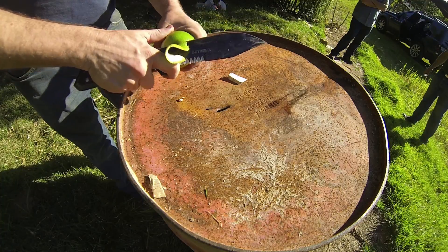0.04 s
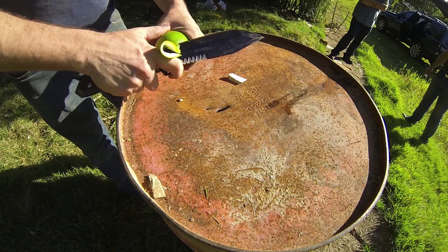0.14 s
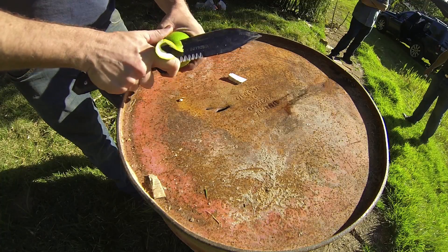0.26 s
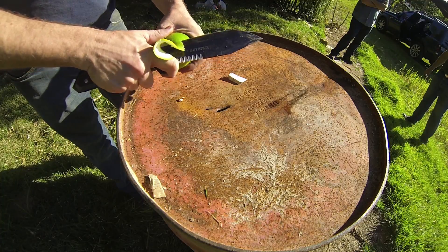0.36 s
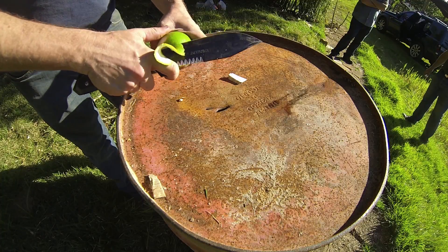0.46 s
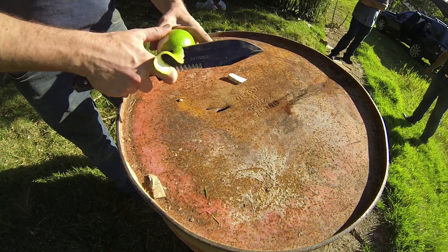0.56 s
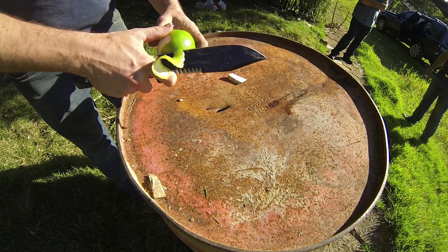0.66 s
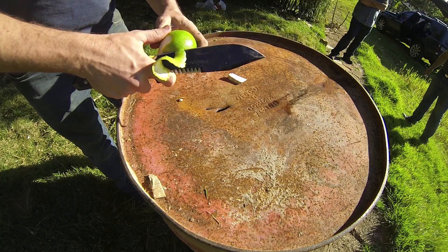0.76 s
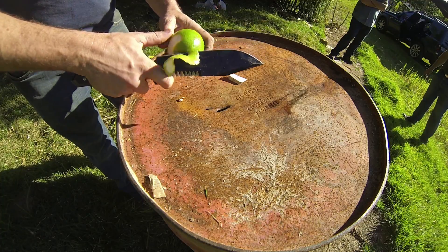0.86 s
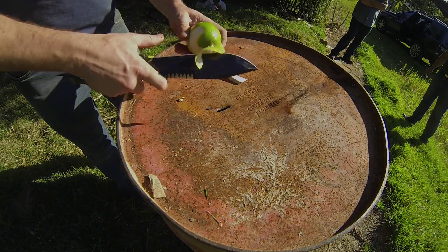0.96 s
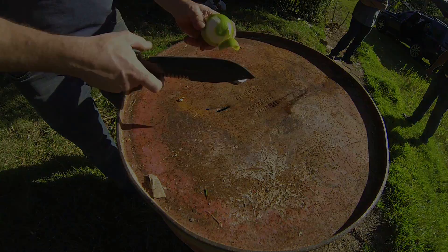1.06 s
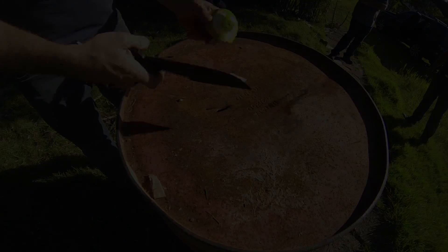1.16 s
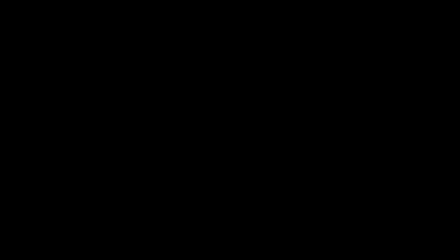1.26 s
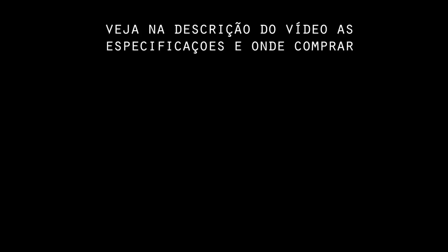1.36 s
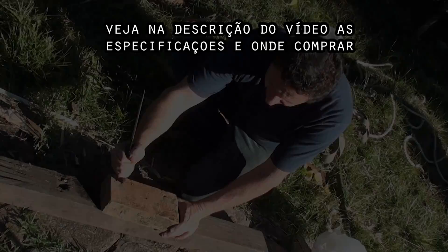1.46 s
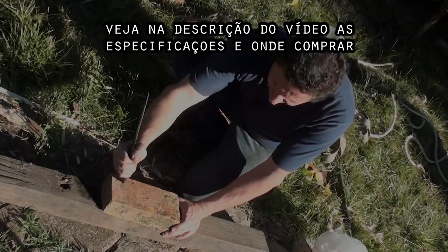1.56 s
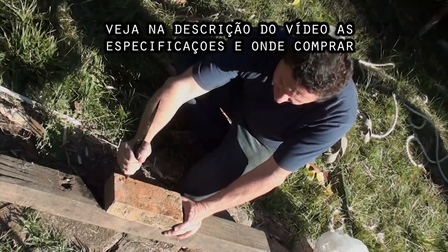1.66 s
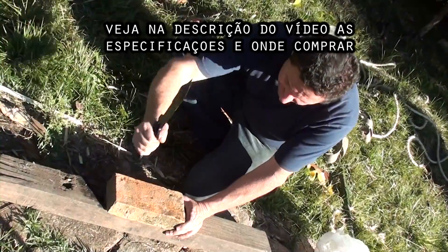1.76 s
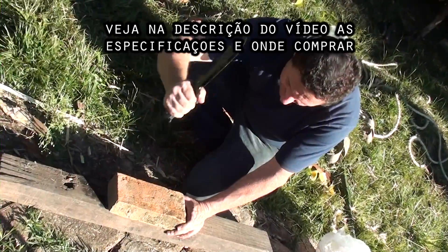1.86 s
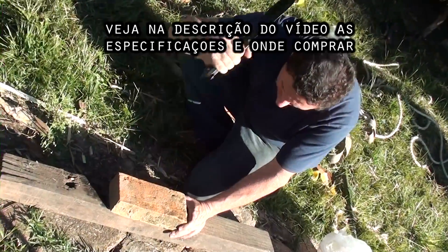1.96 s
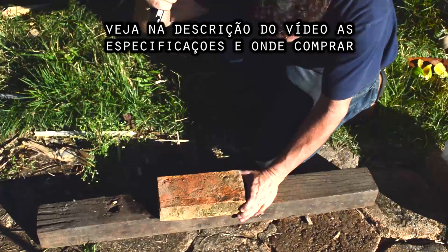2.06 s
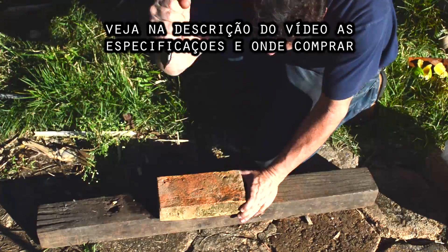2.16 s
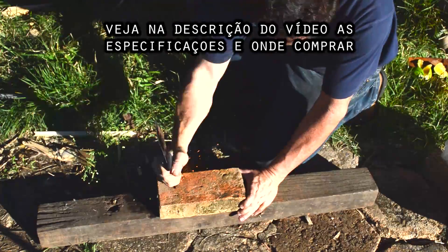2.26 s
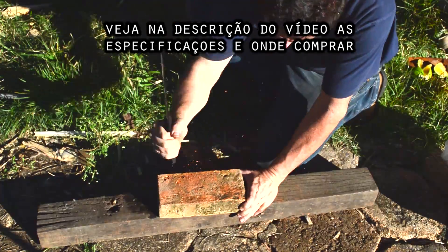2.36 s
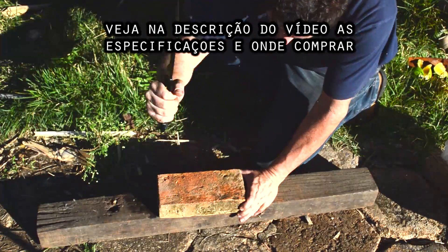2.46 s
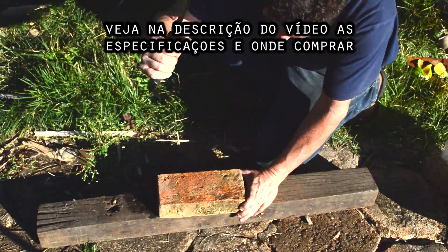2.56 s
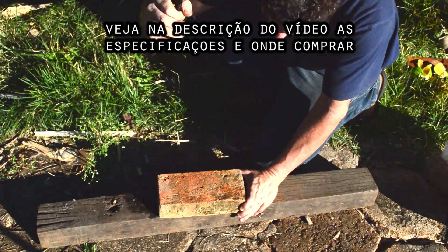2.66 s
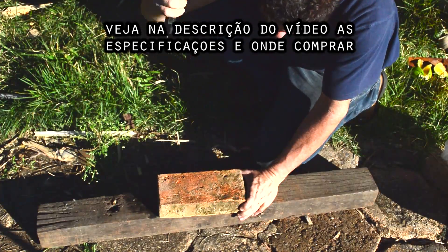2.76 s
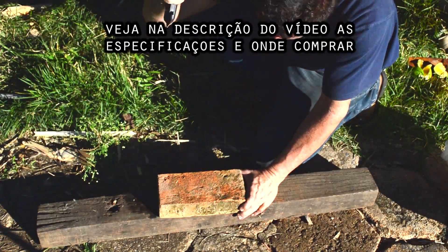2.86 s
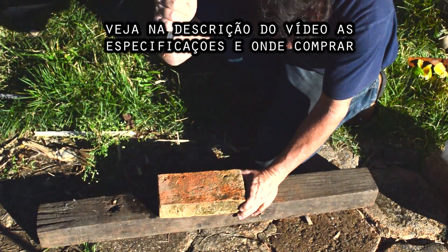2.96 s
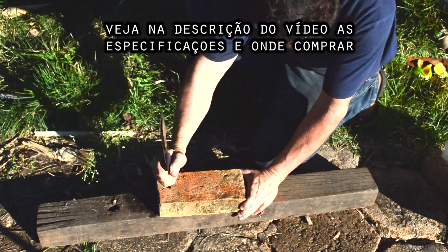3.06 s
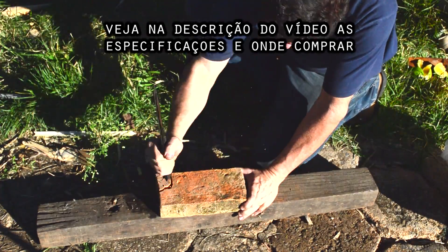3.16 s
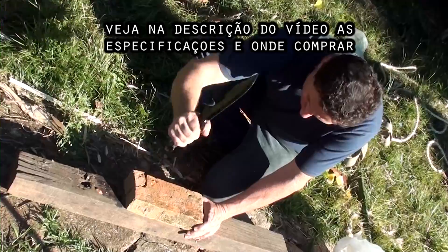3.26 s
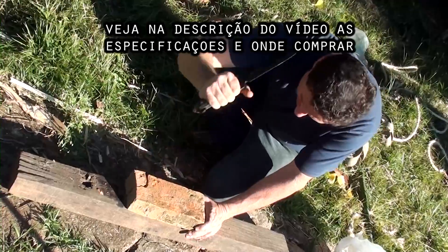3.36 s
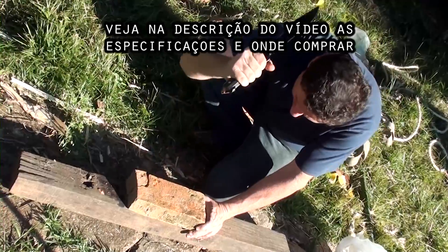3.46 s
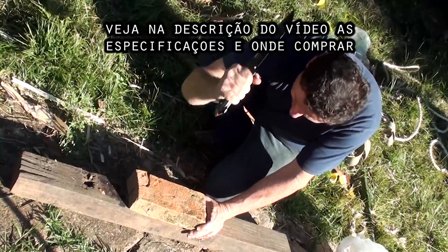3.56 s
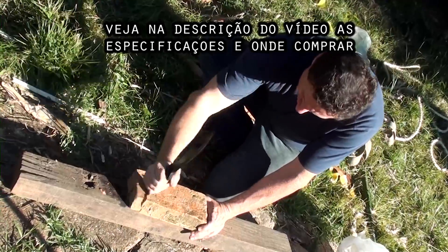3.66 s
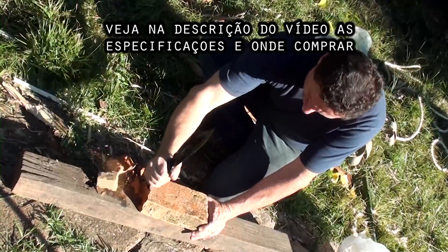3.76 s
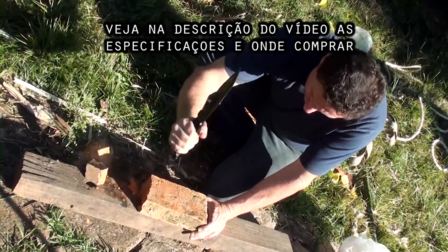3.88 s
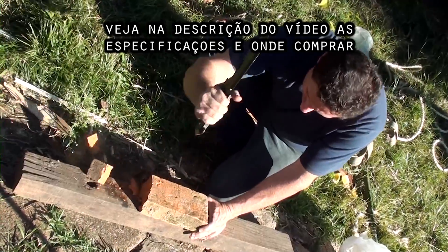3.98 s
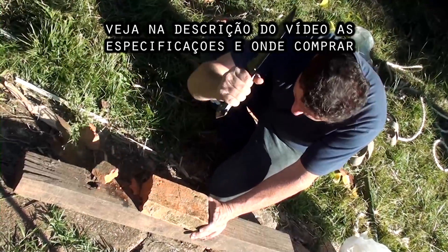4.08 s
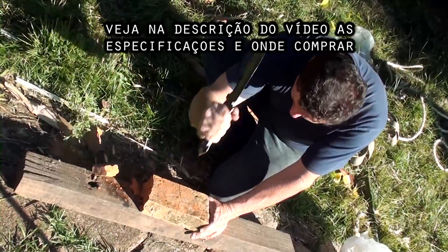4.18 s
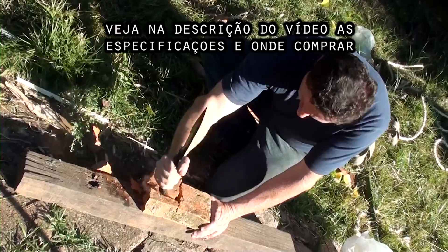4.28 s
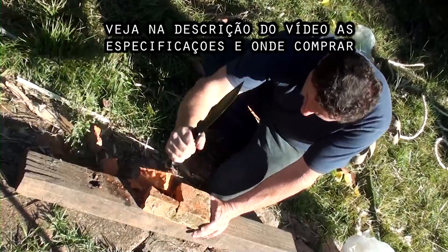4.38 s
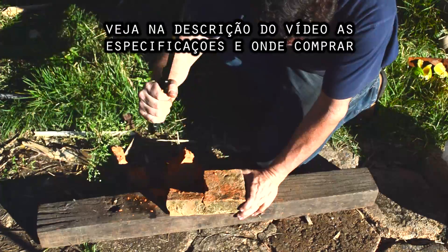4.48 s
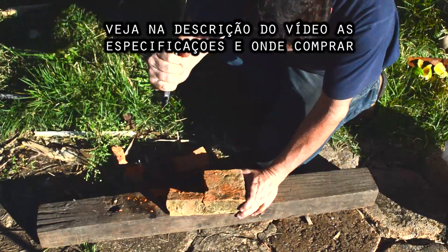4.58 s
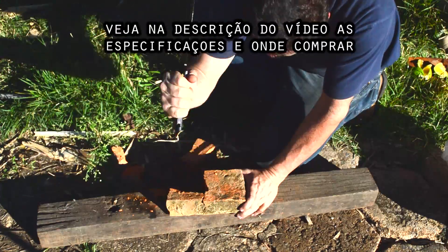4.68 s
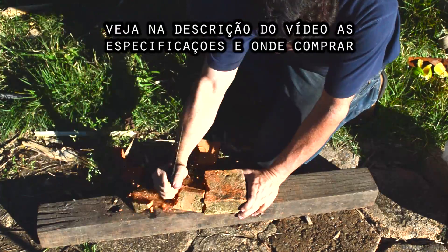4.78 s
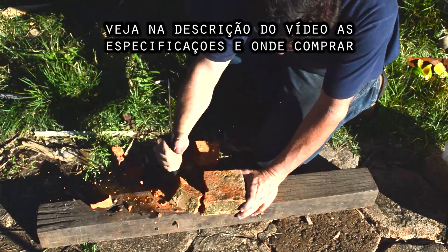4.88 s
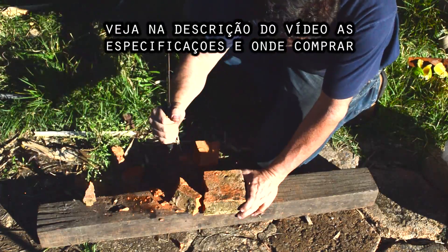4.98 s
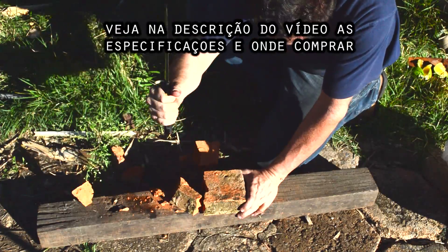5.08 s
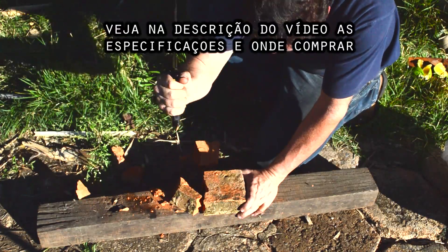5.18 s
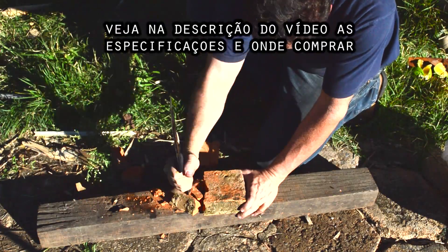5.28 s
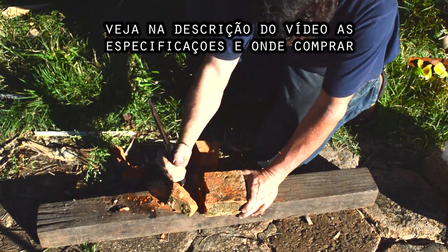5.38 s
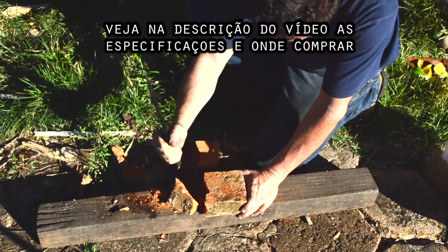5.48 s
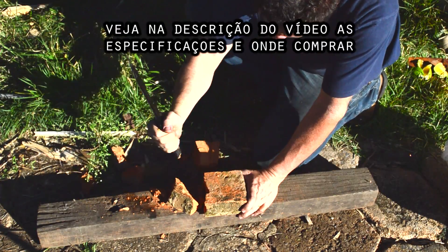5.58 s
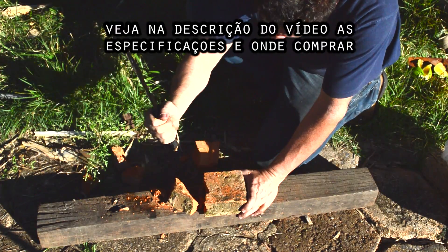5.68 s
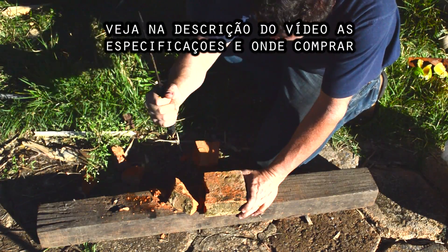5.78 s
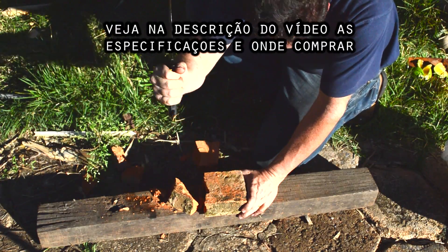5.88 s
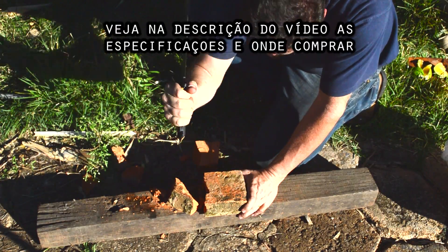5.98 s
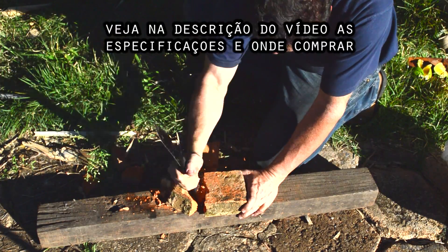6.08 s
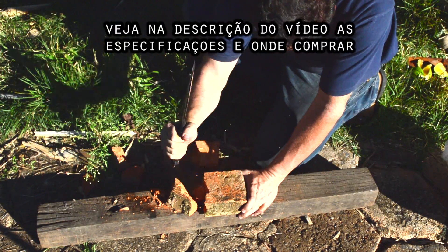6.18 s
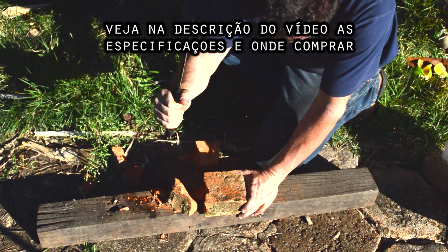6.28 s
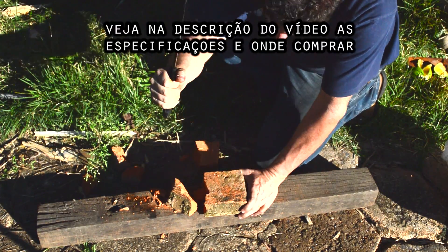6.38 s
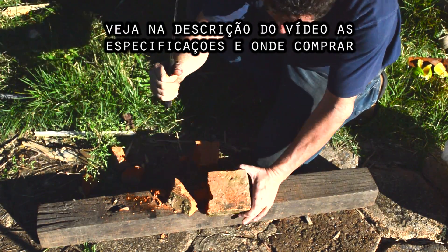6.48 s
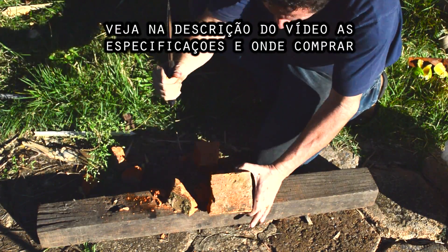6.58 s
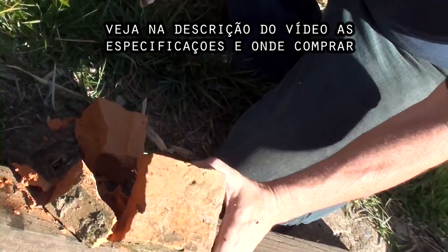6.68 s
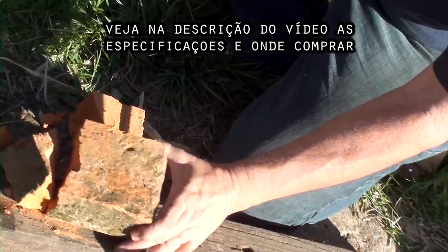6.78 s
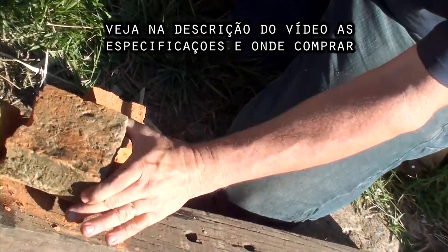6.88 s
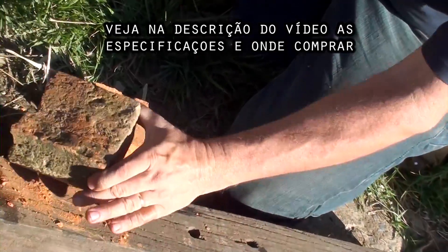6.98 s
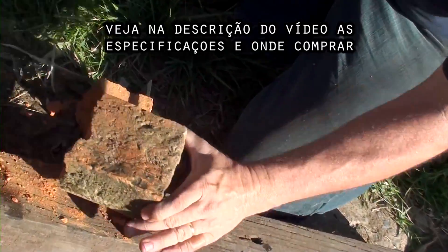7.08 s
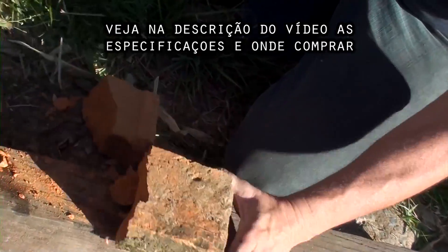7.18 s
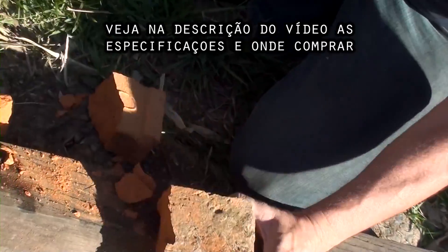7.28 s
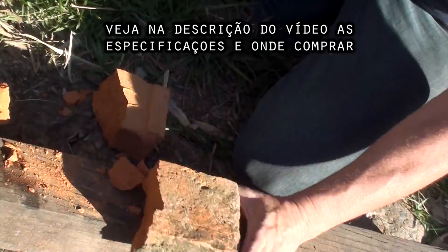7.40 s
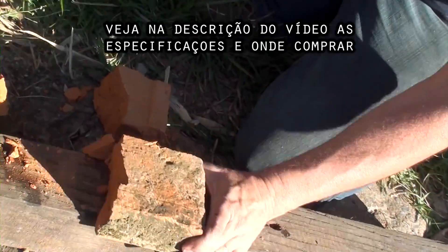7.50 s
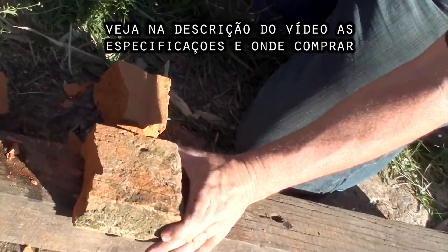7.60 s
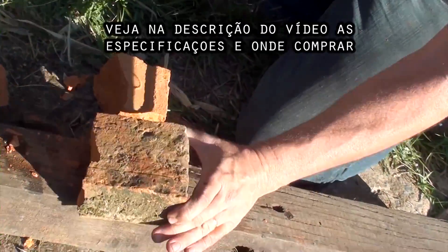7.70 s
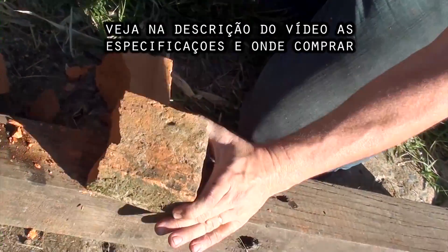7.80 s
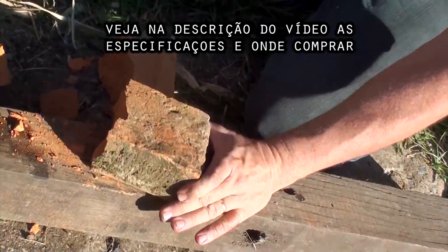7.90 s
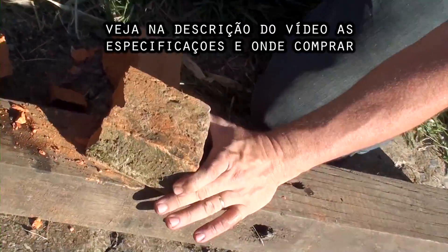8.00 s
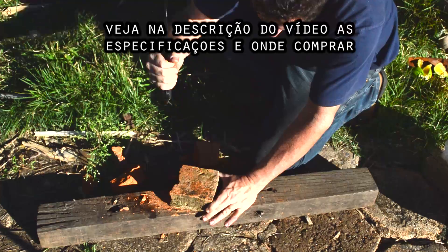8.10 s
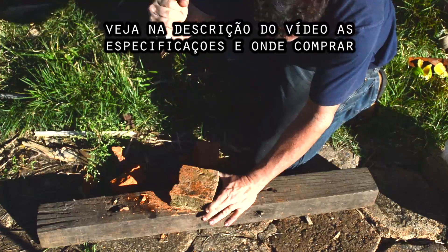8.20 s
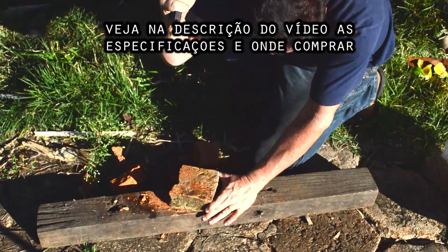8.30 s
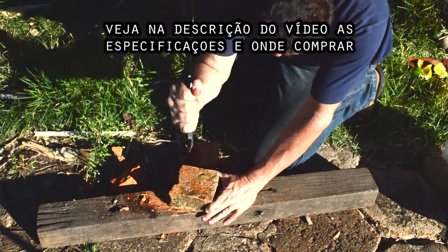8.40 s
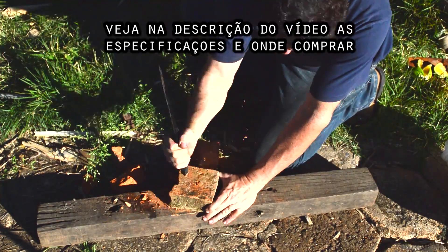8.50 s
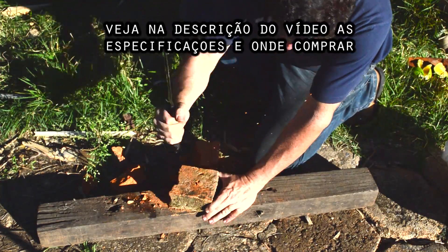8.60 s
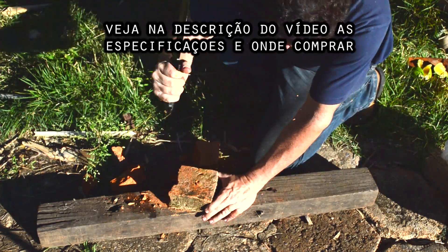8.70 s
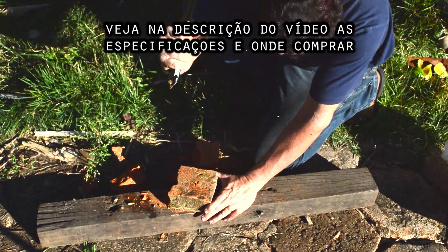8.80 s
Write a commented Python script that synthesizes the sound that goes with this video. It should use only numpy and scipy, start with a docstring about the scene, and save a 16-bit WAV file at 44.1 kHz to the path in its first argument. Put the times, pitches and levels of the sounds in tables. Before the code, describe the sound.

A faint outdoor breeze fades into about a second of silence. A low, humming yard ambience cuts in, and a knife pommel strikes a clay brick on a wooden beam: seven hard, uneven blows, chunks knocking and grit trickling. The brick is then dragged with gritty rasps and clacks before one last heavy blow. Close microphone, overloading on impacts, with faint echoes off nearby walls.

```python
"""Outdoors, a quiet breezy lawn fades to silence; then, in a yard, a knife pommel hammers a clay brick on a wooden beam.
Each blow is a burst of crushing noise plus decaying beam modes, followed by a rattling handle and echoes from nearby walls.
Chunks knock, chips tick and shards ring as short damped sines; trickling grit and the dragged brick are
dense trains of tiny grains. A wavering low hum and a thin high whine run beneath.
The blows pull down the microphone's automatic gain and overload it."""
import sys
import numpy as np
from scipy import signal
from scipy.io import wavfile
from scipy.ndimage import uniform_filter1d

SR = 44100
rng = np.random.default_rng(int(sys.argv[2]) if len(sys.argv) > 2 else 0)


def inscribe(sig):
    """Save sig as 16-bit PCM at rate SR to the path in sys.argv[1].

    A 1-D sig is mono; a 2-D sig holds one channel per row.
    Samples are clipped to [-1, 1] before scaling.
    """
    pcm = np.round(np.clip(np.atleast_2d(sig).T, -1, 1) * 32767)
    wavfile.write(sys.argv[1], SR, pcm.astype(np.int16))


N = 390285
T = np.arange(N) / SR  # s
COARSE = T[::16]  # s, grid for slow envelopes

# Spectrum of the breeze on the lawn: hz, level_db (per Hz, relative)
LAWN_SPECTRUM = [(12, -29), (20, 1), (40, -1.5), (542, -22.5), (590, -23), (780, -26), (4060, -40),
                 (4940, -39), (5530, -44), (12800, -53), (16000, -59)]
# Fade of the lawn: time_s, level_db
LAWN_FADE = [(0, 0.5), (.92, -0.5), (1.05, -4), (1.15, -8.5), (1.24, -17), (1.3, -58)]
# Spectrum of the distant wash in the yard: hz, level_db (per Hz, relative)
YARD_SPECTRUM = [(12, -65), (20, -45), (70, 6.5), (154, -4), (293, -11), (337, -7), (574, -10.5),
                 (2530, -21), (3070, -24), (3440, -22.5), (9950, -26.5), (14700, -34.5), (16000, -35)]
# Pommel blows: start_s, thud_db, thud_t60_s, crack_db, beam_db (lower modes), spot_octaves (above SPOT_HZ),
# upper_db (upper modes), rattle_db, echo_db, thud_tilt_db_per_octave (about 1 kHz)
BLOWS = [(2.302, 10.5, 0.024, 3, 4.5, 1.02, -12, -21, -29, -1.5),
         (3.122, 12, .024, 12, 5.5, 1.2, 5, -20, -25, -0.5),
         (3.737, 9.5, 0.022, 3.5, 7, 1.5, -4, -20, -25.5, 0.9),
         (4.309, 6.5, 0.023, 4, 6, 1.68, -11.5, -11.5, -28, 0.5),
         (4.819, 6, 0.031, 2, 8, 1.25, -10.5, -10, -29.5, -2),
         (5.361, 4.5, 0.04, -0.5, 4.5, 0.76, -29, -9, -36.5, -2.5),
         (6.118, -10, 0.059, -3, 0.5, 1.45, -9, -12.5, -29, 0),
         (8.495, 7.5, 0.033, -1.5, 5.5, 1.59, -15, -14, -31.5, 1.5)]
# Noise spectrum of crushing clay: hz, level_db (per Hz, relative)
THUD_SPECTRUM = [(35, -58.5), (130, -7.5), (618, -5), (928, 2), (1390, -3), (1910, -14.5), (2300, -16),
                 (2570, -26), (2870, -18), (5000, -30), (6500, -20), (11000, -120)]
# Vibration modes of the wooden beam: hz, level_db, t60_s
BEAM_MODES = [(202, 17, 0.021), (434, 0.5, 0.17), (561, 3, 0.028), (842.4, -2.5, 0.052), (943, -0.5, 0.094),
              (1138, -13.5, 0.084), (1358, 4, 0.029), (1455, -10, 0.11), (1863, -5, 0.024), (2151, 0, 0.05),
              (2540, -8.5, 0.087), (2673, -5.5, 0.037), (2950, -10, 0.013), (3850, -26, 0.036)]
# Modes of the loose steel in the handle: hz, level_db, t60_s
STEEL_MODES = [(6620, -4, 0.011), (7600, -15.5, .011), (7470, -4.5, 0.0093)]
# Decay of the wall echoes: hz, t60_s
WALL_DECAY = [(200, 0.078), (900, 0.54), (2700, 1), (3600, 0.4), (10000, 0.064)]
# Spills of crumbs: start_s, swell_s, peak_db, t60_s
SPILLS = [(2.32, 0.012, -37, 0.074), (2.37, 0.03, -44.5, .07), (2.608, .008, -50, 0.73),
          (3.14, 0.011, -40, 0.13), (3.175, 0.0078, -40.5, 0.23), (3.67, .03, -49, .05),
          (3.75, 0.012, -33, 0.67), (3.82, 0.077, -32, 0.077), (3.922, .008, -27, 0.089),
          (3.95, 0.022, -41, 1.7), (4.08, 0.093, -33.5, 0.68), (4.32, .02, -32.5, 0.52),
          (4.499, 0.0034, -41.5, 0.49), (4.661, 0.025, -32.5, 0.084), (4.71, 0.067, -36.5, 0.16),
          (4.83, 0.011, -32, 0.39), (4.96, .01, -29.5, 0.29), (5.11, 0.013, -44, 0.64),
          (5.375, 0.014, -27, 0.19), (5.485, 0.011, -33, 0.22), (5.53, 0.092, -30.5, 0.25),
          (6.13, 0.0086, -31.5, 0.25), (6.281, 0.0038, -42.5, 0.45), (8.509, 0.0076, -33.5, 0.17),
          (8.7, 0.11, -46, 0.14)]
# Spectrum of falling grit: hz, level_db (per Hz, relative)
GRIT_SPECTRUM = [(1180, -48), (2000, -15), (2200, -10), (2380, -13), (3060, -13), (3840, -12.5),
                 (4860, -12), (9660, 0.5), (11000, -3), (16000, -35.5)]
# Chunks knocking on beam and ground: start_s, thud_db, crack_db, beam_db, spot_octaves (above SPOT_HZ)
KNOCKS = [(2.365, -45, -44, -20.5, 0.9), (3.899, -20, -34, -22.5, -0.2), (3.927, -13.5, -26, -29, 0.8),
          (3.939, -18.5, -33, -26.5, -0.4), (4.015, -22, -37, -25, 0.5), (4.089, -16.5, -17, -30, .4),
          (4.133, -15, -21, -10, 1.16), (4.374, -6.5, -39, -2, 2.7), (4.463, -21, -30, -32, -0.3),
          (4.505, -40, -14.5, -26, 0.57), (4.563, -21.5, -42, -27.5, 0.9), (4.661, -22, -43, -22.5, -0.1),
          (4.675, -10, -29, -9, 1.5), (4.772, -36, -34, -25.5, -0.27), (4.862, -10, -39, -10.5, 1.8),
          (5.33, -12, -14, -22, 0.9), (6.137, -2, -9, -17, 3), (6.287, -23.5, -24, -35, 3.5),
          (6.76, -41, -14, -30, -0.5), (6.934, -31, -20, -17, 2.5), (7.004, -26, -25, -31.5, -0.6),
          (7.017, -17, -14, -30, 1.7), (7.204, -37, -1, -14.5, 1.86), (7.307, -44, -19, -39, 3.5),
          (7.342, -47, -21, -35.5, -0.5), (7.505, -40, -32, -22, -0.17), (7.93, -37, -30, -27.5, 0.1),
          (7.976, -17, -22, -19.5, -0.25)]
# Small hard chips ticking: start_s, level_db, pitch_hz
CHIPS = [(2.389, -37, 8630), (2.4663, -41, 3060), (2.5538, -43, 3050), (2.6226, -38, 4570),
         (2.6445, -47, 10200), (2.792, -41, 4300), (3.694, -30, 8700), (3.8136, -18, 9700),
         (3.8691, -17, 7960), (3.8896, -26, 8740), (3.9645, -25, 10800), (4.035, -25.5, 10000),
         (4.165, -19, 9600), (4.248, -31, 10000), (4.6925, -17, 9800), (4.728, -29, 10500),
         (4.7677, -24, 9900), (4.788, -28, 8500), (4.9543, -1.5, 6880), (5.01, -29, 6360),
         (5.0776, -33, 9440), (5.1197, -31.5, 8700), (5.1513, -27, 9500), (5.4896, -31, 8800),
         (5.61, -21, 9300), (6.249, -31, 8000), (6.2951, -27, 11700), (6.3146, -35, 10500),
         (6.5083, -29, 8800), (6.592, -25, 6700), (6.619, -28, 4080), (6.779, -25.5, 6700),
         (6.845, -21, 7100), (7.0568, -18.5, 8900), (7.07, -15, 7660), (7.128, -30.5, 9400),
         (7.226, -37, 7850), (7.3449, -9.5, 8840), (7.5963, -21, 9200), (7.6898, -28, 5700),
         (7.7747, -30, 2250), (7.89, -28.5, 3900), (7.938, -14.5, 9100), (7.9927, -23, 9360),
         (8.5675, -31, 7860), (8.758, -46, 4260)]
# Shards that ring clearly: start_s, level_db, pitch_hz, t60_s, overtones_db
SHARDS = [(3.902, -42, 4700, .07, -12), (4.134, -33, 6650, .033, -8), (4.507, -36, 3340, 0.052, -6),
          (4.565, -38, 6350, 0.022, 0), (4.593, -41, 6350, 0.1, -5), (4.682, -39, 3270, 0.23, -25),
          (4.692, -37, 6300, .06, -10), (4.844, -30, 7900, .03, 4), (4.846, -41, 5840, .05, -12),
          (4.872, -26, 5800, 0.055, -11), (5.330, -35, 6460, .1, -12), (5.332, -23, 9000, 0.056, -11),
          (6.54, -43, 4140, .12, -10), (6.81, -34, 5460, 0.075, -8)]
# Overtones of a shard: pitch_multiple, level_db
SHARD_OVERTONES = [(1.28, 0.5), (1.58, 1), (2.02, -5.5)]
# Pushes of the brick along the beam: start_s, swell_s, rasp_db, t60_s, beam_db, spot_octaves (above SPOT_HZ)
PUSHES = [(6.459, 0.14, -41, 0.26, -62, .5), (6.758, 0.0044, -28, 0.79, -38, 0.85),
          (6.83, 0.047, -26, 0.32, -43.5, 0.77), (7.005, 0.007, -24, 0.12, -39, 0.3),
          (7.035, 0.021, -32.5, 0.23, -68, .5), (7.21, 0.014, -25, 0.065, -19.5, 0.23),
          (7.302, 0.011, -22.5, 0.038, -33, 0.41), (7.334, .008, -36, 0.17, -31.5, 0.49),
          (7.382, 0.21, -37, 0.69, -42.5, 1.74), (7.488, .11, -29.5, .35, -39.5, 1.5),
          (7.85, 0.049, -36.5, 0.044, -48, 1.04), (7.913, 0.0024, -25.5, 0.097, -43.5, 0.57),
          (7.955, 0.056, -37, 0.18, -40, 1.44)]
# Spectrum of rubbed and cracking clay: hz, level_db (per Hz, relative)
RUB_SPECTRUM = [(940, -7.5), (1600, -5), (2330, -9.5), (3700, -4), (4110, -3.5), (6050, -5), (6850, -3.5),
                (8890, 1), (10400, -0.5), (16000, -28.5)]
# Resonances of the rubbed brick: hz, filter_width_hz, level_db
BRICK_BANDS = [(3650, 61, 10), (4680, 17, -20), (5900, 78, 2.5), (6700, 110, 15), (7860, 100, -8),
               (8800, 100, 10), (10200, 150, 14)]
# Beam modes shaken by the rubbing brick: hz, filter_width_hz
SHAKEN_MODES = [(436, 33), (865, 110), (1350, 100)]

LAWN_DB, YARD_DB, HUM_DB = -54, -44.5, -48.5
YARD_START = 2.066  # s
SPOT_HZ, SPOT_FALL_DB = 430, 19  # reference mode; dB lost one octave from the favoured pitch
UPPER_HZ, KNOCK_UPPER_DB = 1800, -11.5  # upper modes lie above this pitch; their level in a knock
KNOCK_T60 = 0.015  # s
RING_ECHO_DB = -2.5  # the walls return the ring of the beam more weakly than the blunt thud
SWELL_DB = -5  # level at the start of a spill or push, under its peak
DUCK_FROM_DB, DUCK_SHARE = -12, 0.22  # gain control: threshold, share of the excess taken off
DETECTOR_FALL_DB_PER_S = 27.5
EDGE_HZ = 16000  # upper band limit


def gain_of(db):
    """Definition of the decibel: amplitude ratio from level."""
    return 10 ** (np.asarray(db) / 20)


def evened(x):
    """Normalisation to unit root-mean-square amplitude."""
    return x / np.sqrt(np.mean(x ** 2) + 1e-20)


def read(points, hz):
    """Interpolation of a curve along a logarithmic frequency axis."""
    f, value = np.transpose(points)
    return np.interp(np.log(hz + 1), np.log(f + 1), value)


def air(points, patchy_db, gust_db):
    """Turbulence as random short-time spectra: patches drift and gusts move the bass."""
    frames, hz = N // 256 + 5, np.fft.rfftfreq(1024, 1 / SR)
    real, imaginary, patches = rng.standard_normal((frames, 513, 3)).T
    across_pitch = uniform_filter1d(patches, 10, 0)
    patches = evened(uniform_filter1d(across_pitch, 12, 1))
    gusts = evened(uniform_filter1d(rng.standard_normal(frames), 14))
    bass_gusts = gusts / (1 + (hz[:, None] / 250) ** 2)
    level_db = read(points, hz)[:, None] + patchy_db * patches + gust_db * bass_gusts
    spectra = (real + 1j * imaginary) * gain_of(level_db)
    return evened(signal.istft(spectra, nperseg=1024, noverlap=768)[1][:N])


def narrow(hz, width):
    """Narrow-band noise: two one-pole filters and a frequency shift give a tone that wavers."""
    r = np.exp(-np.pi * width / SR)
    slow = rng.standard_normal(N) + 1j * rng.standard_normal(N)
    for _ in range(2):
        slow = signal.lfilter([1 - r], [1, -r], slow)
    return evened((slow * np.exp(2j * np.pi * hz * T)).real)


def lawn():
    """Broadband turbulence of a breeze with a faint narrow-band insect trill, faded out."""
    breeze = gain_of(LAWN_DB) * air(LAWN_SPECTRUM, 0.99, 3.4)
    trill = gain_of(-82.5) * narrow(4947, 70)
    return (breeze + trill) * gain_of(np.interp(T, *np.transpose(LAWN_FADE), right=-200))


def yard():
    """Superposition of a distant wash, a wavering hum, faint insect bands and a steady sine whine."""
    wash = gain_of(YARD_DB) * air(YARD_SPECTRUM, 2.7, 0)
    hum = gain_of(HUM_DB) * narrow(66, 21.5)
    insects = gain_of(-65) * narrow(3130, 123) + gain_of(-71) * narrow(4750, 96.7)
    whine = gain_of(-60) * np.sin(2 * np.pi * 15670.3 * T)
    return (wash + hum + insects + whine) * np.clip((T - YARD_START) / 0.0089, 0, 1)


def coloured(x, points):
    """Minimum-phase filtering: a causal filter whose gain follows a spectrum."""
    level_db = read(points, abs(np.fft.fftfreq(4096, 1 / SR)))
    log_gain = np.log(gain_of(np.maximum(level_db, -90)))
    taps = np.fft.ifft(np.exp(np.conj(signal.hilbert(log_gain)))).real[:2048]
    return evened(signal.oaconvolve(x, taps)[:len(x)])


def ring(modes, t, spread_db, flutter_db=0):
    """Modal decay: the struck spot changes share and phase, loose contact makes each sine flutter."""
    hz, db, t60 = np.transpose(modes)[:, :, None]
    share, phase = rng.standard_normal((len(hz), 1)), rng.random((len(hz), 1))
    flutter = evened(uniform_filter1d(rng.standard_normal((len(hz), len(t))), size=220, axis=1))
    flutter = flutter_db * flutter * np.minimum(t / 0.03, 1)
    level_db = db + spread_db * share - 60 * t / t60 + flutter
    return (gain_of(level_db) * np.sin(2 * np.pi * (hz * t + phase))).sum(0)


def reach_db(hz, spot):
    """Modal coupling: modes far in pitch from the one favoured at the spot of contact are driven less."""
    return -SPOT_FALL_DB * (np.log2(hz / SPOT_HZ) - spot) ** 2


def hit(thud_db, thud_t60, crack_db, beam_db, spot, upper_db, tilt_db=0):
    """Impact excitation: crushed clay gives noise bursts, the beam rings; returned as two rows."""
    t = np.arange(round(.3 * SR)) / SR
    noise = rng.standard_normal((2, len(t)))
    tilted = [(hz, db + tilt_db * np.clip(np.log2(hz / 1e3), -2, 2)) for hz, db in THUD_SPECTRUM]
    thud = coloured(noise[0], tilted) * gain_of(thud_db - 60 * t / thud_t60)
    thud *= 1 - np.exp(-t / 0.00043)
    crack = coloured(noise[1], RUB_SPECTRUM) * gain_of(crack_db - 60 * t / (0.52 * thud_t60))
    driven = []
    for hz, db, t60 in BEAM_MODES:
        drive_db = upper_db if hz > UPPER_HZ else beam_db + reach_db(hz, spot)
        driven.append((hz, db + drive_db, t60))
    # The hand pressing the brick damps the ring within the first milliseconds
    pressed = 0.34 + 1.14 * np.exp(-t / 0.0032)
    rings = pressed * ring(driven, t, 1, 4)
    return np.array([thud + crack, rings]) * (1 - np.exp(-t / 0.001))


def add(mix, s, sound):
    """Superposition of a sound on the mix from a given second."""
    part = mix[round(s * SR):][:len(sound)]
    part += sound[:len(part)]


def rattle(db):
    """Repeated impact: loose handle steel chatters as the knife rebounds, from 10 ms after a blow."""
    out, t = np.zeros(4000), np.arange(1200) / SR
    for s in np.cumsum([0, *rng.uniform(0.0025, 0.011, size=3)]):
        chatter = ring(STEEL_MODES, t, 7.6) * (1 - np.exp(-(t / 0.00015) ** 2))
        add(out, s + 0.01, gain_of(db - 610 * s) * chatter)
    return out


def walls(x):
    """Reverberation: sparse echoes of random sign, strongest near 62 ms, each band dying at its own rate."""
    taps = np.zeros(SR)
    at = np.arange(400, SR - 20, 20)
    taps[at + rng.integers(0, 20, len(at))] = rng.choice([-1., 1.], len(at))
    hz, t, z = signal.stft(taps, SR, nperseg=256)
    arrival = 1 + 0.81 * np.exp(-((t - .062) / 0.015) ** 2)
    decay = gain_of(-60 * t / read(WALL_DECAY, hz)[:, None])
    tail = signal.istft(z * arrival * decay, SR, nperseg=256)[1]
    return signal.oaconvolve(x, tail / np.linalg.norm(tail))[:N]


def swell(start, rise, db, t60):
    """Exponential growth and decay: sets in at once, rises to its peak, then dies away (coarse grid)."""
    u = COARSE - start
    growth_db = SWELL_DB * (1 - u / max(rise, 1e-3))
    decay_db = -60 * (u - rise) / max(t60, 1e-2)
    level_db = db + np.where(u < rise, growth_db, decay_db)
    return np.where(u > 0, gain_of(np.minimum(level_db, 0)), 0)


def together(gains):
    """Incoherent addition: unrelated sounds add by power."""
    return np.interp(T, COARSE, np.sqrt(sum(g ** 2 for g in gains)))


def grains(points, per_s, cycles, spread_db, hiss):
    """Granular collisions: ticks of many sizes and pitches arrive in clumps over a fine hiss."""
    clumps = gain_of(7.6 * evened(uniform_filter1d(rng.standard_normal(N), 260)))
    arrives = rng.random(N) < clumps * per_s / SR
    size = gain_of(spread_db * np.minimum(rng.exponential(1, N), 4.5)) * arrives
    kind, t, out = rng.integers(0, 24, N), np.arange(700) / SR, np.zeros(N)
    for k, hz in enumerate(np.geomspace(2500, 14500, num=24)):
        grain = np.sin(2 * np.pi * hz * t) * np.exp(-t * hz / cycles) * gain_of(read(points, hz))
        out += signal.oaconvolve(size * (kind == k), grain * hz / 8000)[:N]
    fine = np.sqrt(clumps) * coloured(rng.standard_normal(N), points)
    return evened(evened(out) + hiss * fine)


def debris():
    """Granular flow: crumbs fall on beam and stones in swelling and dying spills."""
    return grains(GRIT_SPECTRUM, 900, 5.4, 3.5, 0.72) * together(swell(*row) for row in SPILLS)


def knock(thud_db, crack_db, beam_db, spot):
    """Impact of a falling chunk: a short hit whose upper modes follow the spot of contact."""
    upper_db = beam_db + KNOCK_UPPER_DB + reach_db(UPPER_HZ, spot)
    return hit(thud_db, KNOCK_T60, crack_db, beam_db, spot, upper_db).sum(0)


def chip(db, hz):
    """Damped resonance of a small body: a click with a brief ring at its own pitch."""
    t = np.arange(1200) / SR
    tone = ring([(hz, 0, .011), (min(1.43 * hz, 15000), -7, .005), (0.88 * hz, -10, .006)], t, 3.6)
    click = coloured(rng.standard_normal(len(t)), GRIT_SPECTRUM) * gain_of(-5 - 60 * t / 0.016)
    return gain_of(db) * (1.23 * tone + click)


def shard(db, hz, t60, overtones_db):
    """Inharmonic resonance: a hard shard rings at pitches that are not whole multiples."""
    modes = [(hz, 0, t60)]
    for multiple, mode_db in SHARD_OVERTONES:
        modes.append((min(multiple * hz, 15000), overtones_db + mode_db, t60))
    return gain_of(db) * ring(modes, np.arange(6000) / SR, 1.5, 3.0)


def drag():
    """Frictional excitation: slipping grit gives a rasp, the brick's bands and low beam modes."""
    slips = gain_of(0.95 * evened(uniform_filter1d(rng.standard_normal(N), 400)))
    bands = evened(sum(gain_of(db) * narrow(hz, width) for hz, width, db in BRICK_BANDS))
    rasp = grains(RUB_SPECTRUM, 1500, 32.0, 4.3, 0.77)
    out = (rasp + 0.22 * bands * slips) * together(swell(*row[:4]) for row in PUSHES)
    for hz, width in SHAKEN_MODES:
        shaken = together(swell(s, rise, db + reach_db(hz, spot), t60)
                          for s, rise, _, t60, db, spot in PUSHES)
        out += narrow(hz, width) * slips * shaken
    return out


def scene():
    """Superposition of near sounds, their wall echoes and the two outdoor backgrounds."""
    near, to_walls = debris() + drag(), np.zeros(N)
    for s, *row, rattle_db, echo_db, tilt_db in BLOWS:
        clay, beam = hit(*row, tilt_db)
        add(near, s, clay + beam)
        add(near, s, rattle(rattle_db))
        add(to_walls, s, gain_of(echo_db) * (clay + gain_of(RING_ECHO_DB) * beam))
    for s, *row in KNOCKS:
        chunk = knock(*row)
        add(near, s, chunk)
        add(to_walls, s, gain_of(-33) * chunk)
    for s, *row in CHIPS:
        add(near, s, chip(*row))
    for s, *row in SHARDS:
        add(near, s, shard(*row))
    return (near + walls(to_walls) + lawn() + yard())[None]


def record(dry):
    """Automatic gain control and overload: gain drops late, recovers slowly; clipping and a band limit follow."""
    power = uniform_filter1d(np.clip(dry[0], -1, 1) ** 2, size=400)
    power_db = 10 * np.log10(power + 1e-12)
    # The detector holds each peak and lets it fall at a constant rate
    fall = T * DETECTOR_FALL_DB_PER_S
    held_db = np.maximum.accumulate(power_db + fall) - fall
    over_db = np.maximum(held_db - DUCK_FROM_DB, 0)
    # Averaging over the past 901 samples, then a delay of 500, makes the control late
    late_db = uniform_filter1d(over_db, size=901, origin=450)
    late_db = np.concatenate([np.zeros(500), late_db[:-500]])
    clipped = np.clip(dry / gain_of(DUCK_SHARE * late_db), -1, 1)
    band_limit = signal.firwin(511, EDGE_HZ, window=("kaiser", 9), fs=SR)
    return signal.oaconvolve(clipped, band_limit[None], "same")


dry = scene()
out = record(dry)
inscribe(out)
```